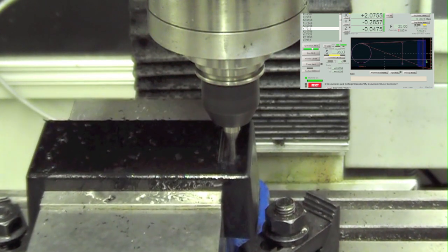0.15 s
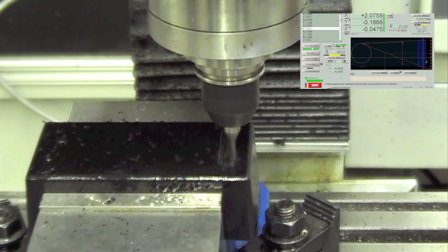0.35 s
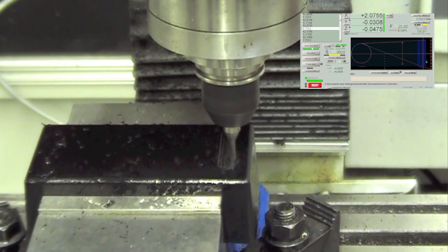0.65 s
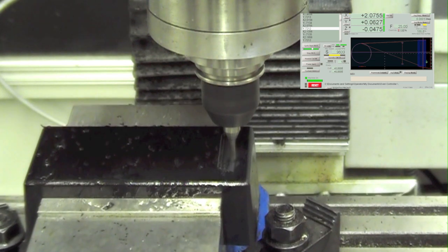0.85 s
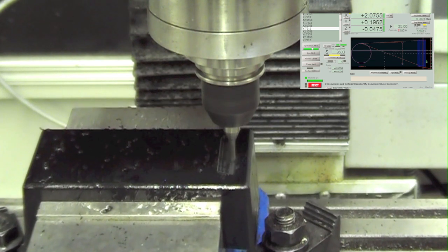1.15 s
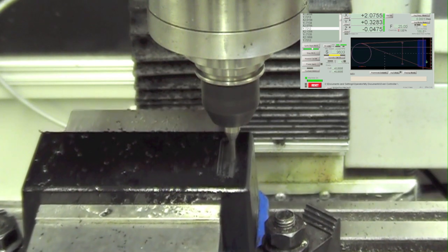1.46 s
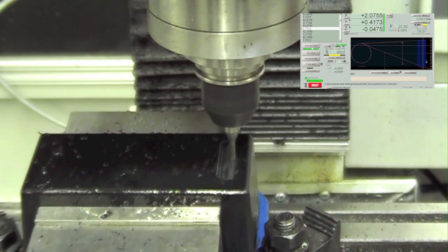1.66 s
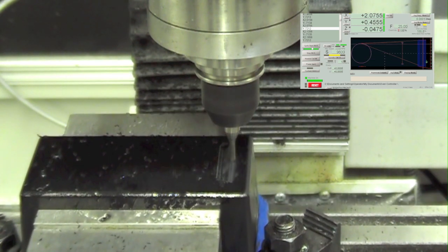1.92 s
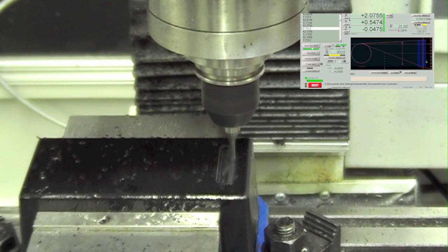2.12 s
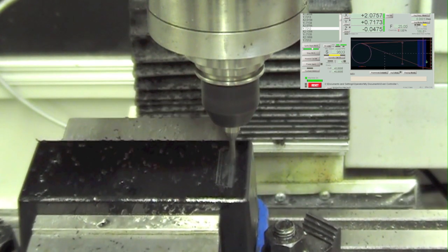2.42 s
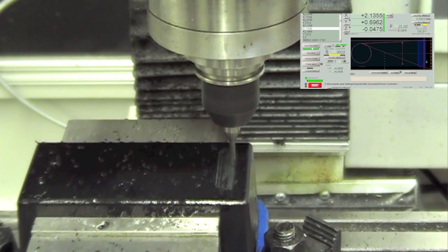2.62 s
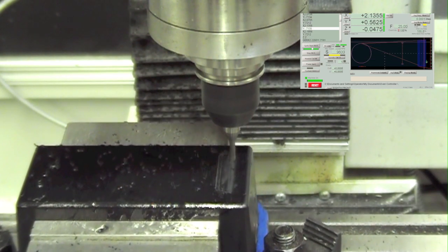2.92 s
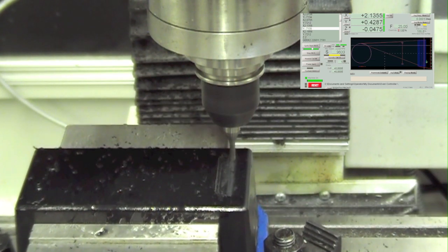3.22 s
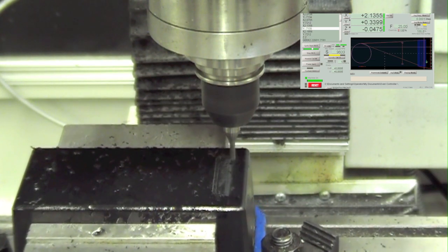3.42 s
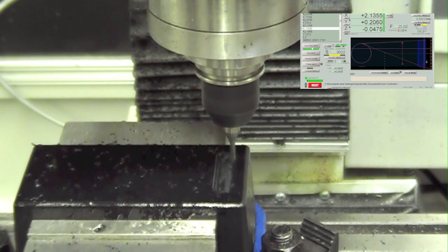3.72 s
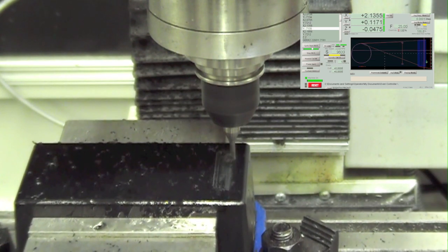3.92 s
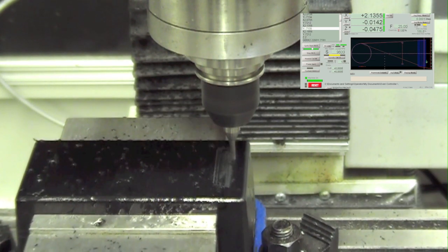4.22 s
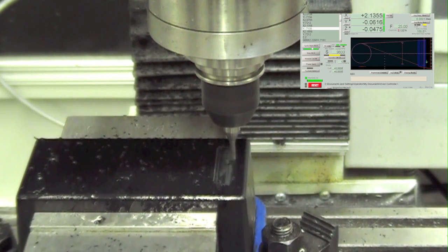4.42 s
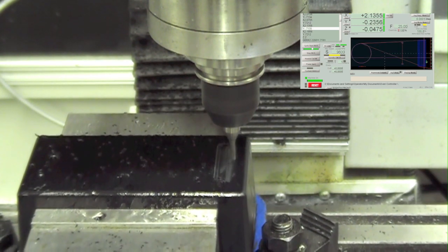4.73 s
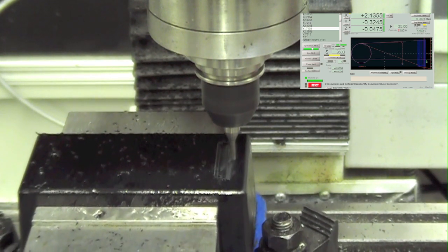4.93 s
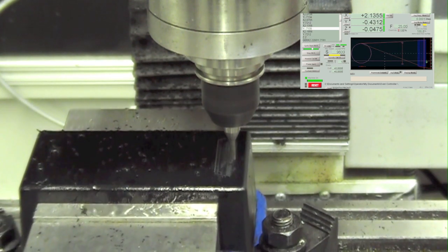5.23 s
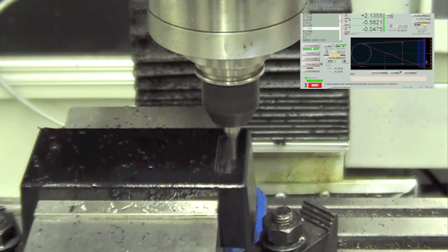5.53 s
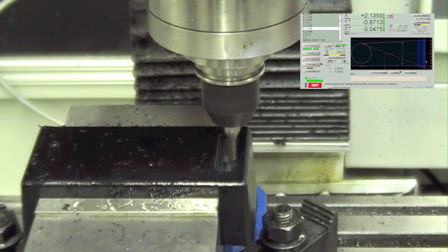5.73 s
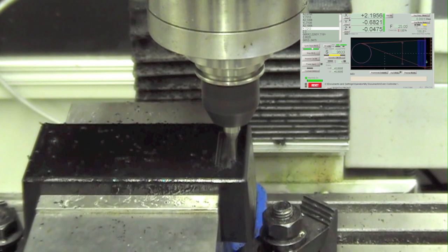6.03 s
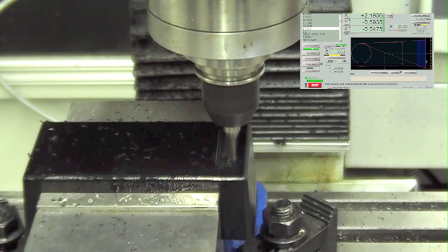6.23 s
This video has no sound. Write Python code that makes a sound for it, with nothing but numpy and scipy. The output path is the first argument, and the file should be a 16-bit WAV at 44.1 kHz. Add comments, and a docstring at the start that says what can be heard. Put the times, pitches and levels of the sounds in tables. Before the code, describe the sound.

Harsh blasts of compressed air hiss over a milling machine's steady spindle whine and grinding cut, the machine ducking under each blast and swelling back.

```python
"""Machine shop, close up: a belt-driven spindle runs a two-flute end mill along a metal block.
Spindle and motor whine as stacks of harmonics; the cut grinds as noise pulsed by each flute entering.
Blasts from an air nozzle clear the chips: broadband hiss coloured by the surface it strikes.
The recorder's gain control ducks everything under each blast and lets it swell back afterwards."""
import sys
import numpy as np
from scipy import signal
from scipy.fft import rfft, irfft, next_fast_len
from scipy.io import wavfile

SR = 44100
rng = np.random.default_rng(int(sys.argv[2]) if len(sys.argv) > 2 else 0)


def to_wav(s):
    """Save 16-bit WAV."""
    ch = np.atleast_2d(s).T  # columns
    pcm = np.round(np.clip(ch, -1, 1) * 32767)  # PCM
    wavfile.write(sys.argv[1], SR, pcm.astype(np.int16))


N = 280476
TIME = np.arange(N) / SR   # s
SIZE = next_fast_len(N)
FREQS = np.maximum(np.arange(SIZE // 2 + 1) * SR / SIZE, 1)   # Hz

# drive motor and bearing tones [multiple of the motor's rotation rate, relative level/dB]
MOTOR_TONES = [(1, -51), (4, -43), (5, -31), (6, -26), (7, -41), (9.5, -40), (18.3, -37)]
# air jet spectrum [f/Hz, relative level per Hz/dB]
JET_SPECTRUM = [(30, -46), (500, -31.5), (2000, -22.5), (2550, -20), (3300, -13), (4400, -11.5),
                (6100, -12), (7200, -4.5), (8800, -0.5), (10500, -5), (12200, -11), (13700, -12),
                (14500, -19.5), (15800, -30)]
# resonances and gaps of the jet striking tool and work
# [f/Hz, width/Hz, lift aimed at the tool/dB, lift aimed at the block/dB]
JET_RESONANCES = [(3880, 1000, -0.5, -2), (5560, 270, 7.5, -0.5), (6170, 250, -1, 2), (6700, 200, 4.5, 6.5),
                  (7640, 170, -5.5, -4.5), (7930, 280, 5.5, -1), (8500, 140, -3.5, -2),
                  (8840, 330, -0.5, 4.5), (9300, 180, 4.5, 1.5), (10600, 180, -2, -8.5),
                  (12540, 300, -9, -9), (12960, 270, 4, 9.5)]
# stereo width of the jet [f/Hz, side minus mid level/dB]
JET_STEREO = [(100, -9), (500, 2), (1500, -3.5), (3000, -47), (4800, -45), (6000, -6.5), (9000, -10),
              (10300, -4.5), (12000, -3.5), (14500, -18)]
# where the jet strikes [t/s, aim from 0 tool to 1 block]
JET_AIM = [(0, .6), (1.1, 0), (2, 0), (4.25, 0.54), (5.2, 0.86), (5.8, 0), (6.36, 0.17)]
# blasts of the air nozzle, the weak ones with the valve barely open
# [opens t/s, closes t/s, level/dB, level trend/dB per s, top-octave sizzle/dB, sizzle trend/dB per s]
AIR_BLASTS = [(-.05, 0.247, 5.5, -5, 2.5, -12), (0.551, 0.844, -19.5, -2, -8, 5),
              (0.845, 1.09, -9.5, -3, -7, 3), (1.077, 1.991, 4, 3, 4, -3.5), (4.095, 4.23, -23, 3, -7, -3),
              (4.232, 6.4, 6, -1.6, 0.5, 1.5)]
# spindle harmonics [multiple of the rotation rate, level with flutes biting/dB, level with flutes rubbing/dB]
SPINDLE_HARMONICS = [(1, -33, -35), (3, -37, -48), (4, -39, -33), (5, -36, -35), (6, -48, -25),
                     (7, -45, -32), (8, -40, -32), (9, -40, -33), (10, -34, -34), (12, -26, -32),
                     (13, -42, -32), (14, -50, -42), (17, -45, -33), (18, -32, -39), (19, -35, -37),
                     (20, -37, -37), (24, -37, -35), (26, -31, -40), (28, -38, -40), (32, -37, -41),
                     (34, -33, -45), (36, -39, -51), (37, -42, -53), (38, -42, -53), (44, -38, -48),
                     (45, -36, -44), (46, -36, -48), (47, -32, -45), (48, -32, -51), (50, -28, -44),
                     (51, -40, -43), (52, -37, -45), (54, -38, -51), (56, -38, -46), (58, -36, -45),
                     (60, -41, -54), (62, -37, -48), (64, -42, -56), (66, -47, -61), (70, -50, -65),
                     (79, -50, -59)]
# grinding noise spectrum [f/Hz, relative level per Hz/dB]
GRIND_SPECTRUM = [(30, -29), (90, -27), (150, -25.5), (235, -6), (420, -7.5), (900, 1.5), (1400, -1),
                  (2350, -6), (3400, -5.5), (5200, -9.5), (8500, -6.5), (11000, -14.5), (12200, -18),
                  (14500, -33.5)]
# resonances of head, vice and table [f/Hz, width/Hz, lift/dB]
FRAME_RESONANCES = [(138, 22, 13), (278, 39, 10.5), (515, 9.9, 6.5), (569, 34, 13.5), (1580, 13, 7.5),
                    (1756, 62, 7), (3340, 40, 7), (4200, 160, 1.5), (10960, 410, 5.5)]
# stereo width of whine and grinding [f/Hz, side minus mid level/dB]
CUT_STEREO = [(60, -22), (170, -40), (700, -22.5), (2600, -34.5), (5000, -14.5), (7500, -8), (9500, -8),
              (12000, -11), (14000, -59)]
# two microphone ports resonating at different pitches [f/Hz, left minus right level/dB, left's lead/rad]
MIC_PORTS = [(5000, 0, 0), (6500, 0.5, 0), (7900, 2, -0.35), (8600, 1.8, -0.85), (9800, -3.6, -1.07),
             (10700, -1.5, -.3), (11700, -3.5, -.3), (14500, 0.5, 0.17)]

SPINDLE_HZ, MOTOR_HZ = 173.8, 117.35   # rotation rates
WHINE_WAVER_DB = 1.1   # rms waver of each spindle harmonic
VALVE_OPEN_S, VALVE_SHUT_DB_PER_S = 0.042, 846
# the cutting force builds up to its heaviest moment, then eases
HEAVIEST_S, LOAD_RISE_DB_PER_S, LOAD_EASE_DB_PER_S = 4.05, 0.58, 1.55
GRIND_DB, MOTOR_DB = -14.5, 2.1   # gains at the heaviest moment
MOTOR_FOLLOWS = 1.8   # motor dB per dB of force
# bite from 0 rubbing to 1 biting; from RUN_OUT_S the flutes run out of fresh metal
FIRST_BITE, BITE_PER_S, RUN_OUT_S, RUN_OUT_LENGTH_S = 0.34, 0.51, 3.15, 0.31
# gain control and top cut
LIMIT_DB, RELEASE_DB_PER_S, DETECTOR_S, ATTACK_S = -12.5, 61, 0.0056, 0.00045
CUTOFF_HZ = 15750


def from_db(db):
    """Decibels to gain."""
    return 10 ** (np.asarray(db) / 20)


def rms_one(x):
    """Scale to unit rms."""
    return x / np.sqrt(np.mean(x ** 2) + 1e-20)


def colour(points, peaks=()):
    """Gain per frequency: a slope drawn over log frequency, with resonances lifting or dipping it."""
    hz, db = np.transpose(points)
    gain_db = np.interp(np.log(FREQS), np.log(hz), db)
    for centre, width, lift in peaks:
        gain_db = gain_db + lift / (1 + (2 * (FREQS - centre) / width) ** 2)
    return from_db(gain_db)


def smooth(x, seconds):
    """One-pole lag, settled at the start."""
    r = np.exp(-1 / (seconds * SR))
    settled = r * np.mean(x[:SR // 200])
    return signal.lfilter([1 - r], [1, -r], x, zi=[settled])[0]


def drift(rate_hz):
    """Slow random wander of unit rms: noise through a two-pole low-pass."""
    step = 40   # samples between points of the wander
    r = np.exp(-2 * np.pi * rate_hz * step / SR)
    noise = rng.standard_normal(N // step + 2002)
    slow = signal.lfilter([1], [1, -2 * r, r * r], noise)[2000:]   # skip the filter's run-in
    return np.interp(np.arange(N) / step, np.arange(len(slow)), rms_one(slow))


def shaped(x, gain):
    """Filter by a gain per frequency."""
    return irfft(rfft(x, SIZE) * gain, SIZE)[..., :N]


def spread(mid, side, width):
    """Left and right from a common part and a differing one."""
    return mid + shaped(side, colour(width)) * [[1], [-1]]


def rotation(hz, wobble):
    """Shaft angle in radians, with a slight unsteadiness of speed."""
    return 2 * np.pi * np.cumsum(hz * (1 + wobble * drift(5.4))) / SR


def motor(waver_db):
    """Motor and bearing tones locked to one shaft, each wavering in level on its own."""
    angle = rotation(MOTOR_HZ, wobble=0.00155)
    tones = np.zeros(N)
    for order, db in MOTOR_TONES:
        tones += from_db(db + waver_db * drift(9.1)) * np.sin(order * angle)
    return np.sqrt(2) * tones


def nozzle():
    """Air gain and sizzle in dB: the valve opens quickly, the flow drifts while held and dies as it shuts."""
    power, weighted_sizzle = 1e-12, 0
    for opens, closes, level_db, trend_db, sizzle_db, sizzle_trend_db in AIR_BLASTS:
        held = np.clip(TIME, opens, closes) - opens
        opening = np.minimum(held / VALVE_OPEN_S, 1)
        shutting = from_db(-VALVE_SHUT_DB_PER_S * np.maximum(TIME - closes, 0))
        blast_power = (opening * shutting * from_db(level_db + trend_db * held)) ** 2
        power = power + blast_power
        weighted_sizzle = weighted_sizzle + blast_power * (sizzle_db + sizzle_trend_db * held)
    return np.sqrt(power), weighted_sizzle / power


def jet_hiss(aim):
    """Turbulence noise; its resonances crossfade with the surface that the jet strikes."""
    turbulence, peaks = rng.standard_normal((2, N)), np.array(JET_RESONANCES)
    on_tool = shaped(turbulence, colour(JET_SPECTRUM, peaks[:, [0, 1, 2]]))
    on_block = shaped(turbulence, colour(JET_SPECTRUM, peaks[:, [0, 1, 3]]))
    mid, side = rms_one((1 - aim) * on_tool + aim * on_block)
    return spread(mid, side, JET_STEREO)


def air_jet(aim, sizzle_db, sizzle_hz, body_hz, thinning, patchy_db, flutter_db, count=14):
    """The hiss shifts colour as the jet is deflected: more sizzle on top, less body below."""
    hiss = rfft(jet_hiss(aim), SIZE)
    out = np.zeros((2, N))
    centres = np.linspace(2500, 14500, count)   # Hz
    for hz, share in zip(centres, np.eye(count)):
        # overlapping triangular bands that add up to the whole hiss
        band = irfft(hiss * np.interp(FREQS, centres, share), SIZE)[:, :N]
        top = 1 / (1 + (sizzle_hz / hz) ** 24)
        body = 1 / (1 + (hz / body_hz) ** 8)
        tilt = top - thinning * body
        out += band * from_db(tilt * sizzle_db + patchy_db * drift(2.0))
    return out * from_db(flutter_db * drift(26))


def enclosure(x, t60, echo_db):
    """Dense echoes off the nearby metal comb the hiss with a fine, steady ripple."""
    age = TIME[:SR // 10]
    decay = from_db(-60 * age / t60) * (age > .002)   # first echo after 2 ms
    echoes = rng.standard_normal(len(age)) * decay
    echoes *= from_db(echo_db) / np.linalg.norm(echoes)
    return shaped(x, 1 + rfft(echoes, SIZE))


def cutting_force():
    """Force on the tool in dB relative to its heaviest moment."""
    before = np.maximum(HEAVIEST_S - TIME, 0)
    after = np.maximum(TIME - HEAVIEST_S, 0)
    return -LOAD_RISE_DB_PER_S * before - LOAD_EASE_DB_PER_S * after


def engagement():
    """How far the flutes bite: deeper up to full bite, until they run out of metal and only rub."""
    deepening = np.clip(FIRST_BITE + BITE_PER_S * TIME, 0, 1)
    metal_left = np.clip(1 - (TIME - RUN_OUT_S) / RUN_OUT_LENGTH_S, 0, 1)
    return deepening * metal_left


def whine(angle, bite):
    """Harmonics of the spindle; their balance shifts as the flutes go from biting to rubbing."""
    mid, side = np.zeros((2, N))
    for order, biting_db, rubbing_db in SPINDLE_HARMONICS:
        balance_db = bite * biting_db + (1 - bite) * rubbing_db
        gain = from_db(balance_db + WHINE_WAVER_DB * drift(6))
        mid += gain * np.cos(order * angle + 2 * np.pi * rng.random())
        side += gain * np.cos(order * angle + 2 * np.pi * rng.random())
    return np.sqrt(2) * spread(mid, side, CUT_STEREO)


def grinding(angle, bite, pulsing, scrape_hz, flutter_db):
    """Chips tear off and shake the frame; the bright scrape comes in a burst as each flute enters."""
    entry = np.exp(-4 * (angle / np.pi % 1))   # two flutes per turn
    flute = entry * (1 + 0.33 * np.cos(angle))   # runout makes one flute cut deeper
    bursts = rms_one(1 + pulsing * bite * rms_one(flute))
    friction = rng.standard_normal((2, N))
    bright = 1 / (1 + (scrape_hz / FREQS) ** 4)
    force = shaped(friction, 1 - bright) + shaped(friction * bursts, bright)
    mid, side = rms_one(shaped(force, colour(GRIND_SPECTRUM, FRAME_RESONANCES)))
    return spread(mid, side, CUT_STEREO) * from_db(flutter_db * drift(16))


def ports(x):
    """Each microphone port favours its own part of the treble and shifts its phase."""
    hz, level_db, lead_rad = np.transpose(MIC_PORTS)
    balance_db, lead = np.interp(FREQS, hz, level_db), np.interp(FREQS, hz, lead_rad)
    half = np.array([[.5], [-.5]])   # left gets half the difference, right the opposite half
    return shaped(x, from_db(half * balance_db) * np.exp(1j * half * lead))


def scene():
    """Motor, air jet, spindle and cut, all close in front of the microphone."""
    bite, force_db = engagement(), cutting_force()
    drive = from_db(MOTOR_DB + MOTOR_FOLLOWS * force_db) * motor(waver_db=1.5)
    blast, sizzle_db = nozzle()
    aim = np.interp(TIME, *np.transpose(JET_AIM))
    air = blast * air_jet(aim, sizzle_db, sizzle_hz=11900, body_hz=6340, thinning=0.13,
                          patchy_db=.5, flutter_db=0.51)
    angle = rotation(SPINDLE_HZ, wobble=.0003)
    spindle = whine(angle, bite)
    cut = from_db(GRIND_DB + force_db) * grinding(angle, bite, pulsing=0.16, scrape_hz=3520, flutter_db=0.45)
    return ports(drive + enclosure(air, t60=0.069, echo_db=-9.0) + spindle + cut)


def record(dry):
    """Gain control: drops almost at once on loud sound, climbs back at a steady rate; the top is cut."""
    power = smooth(np.mean(dry ** 2, axis=0), DETECTOR_S)
    level_db = 10 * np.log10(power + 1e-12)
    excess_db = np.maximum(level_db - LIMIT_DB, 0)
    climb_db = RELEASE_DB_PER_S * TIME
    # hold each peak of the excess, let down along the climb
    held_db = np.maximum.accumulate(excess_db + climb_db) - climb_db
    duck_db = smooth(held_db, ATTACK_S)
    top_cut = signal.ellip(12, .1, 90, CUTOFF_HZ, fs=SR, output="sos")
    return signal.sosfilt(top_cut, dry * from_db(-duck_db))


dry = scene()
out = record(dry)
to_wav(out)
```